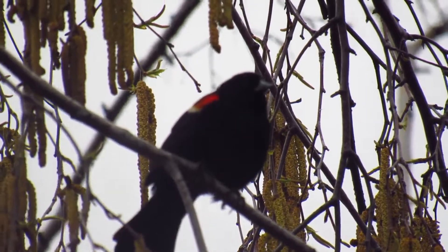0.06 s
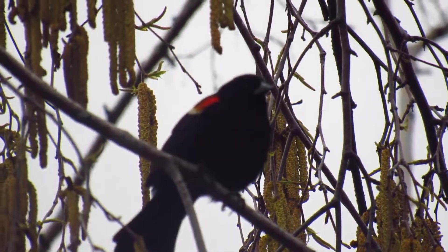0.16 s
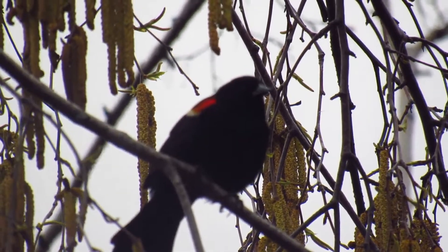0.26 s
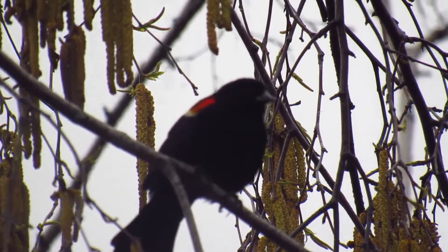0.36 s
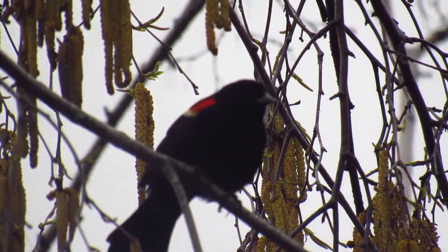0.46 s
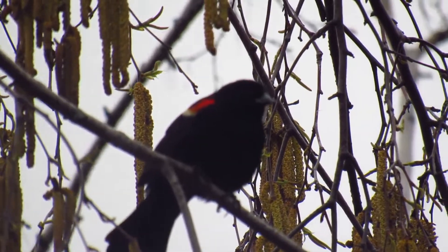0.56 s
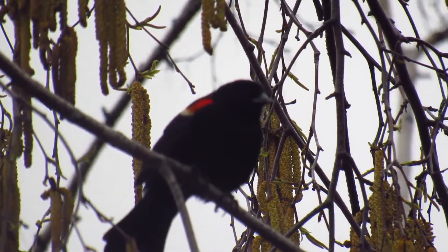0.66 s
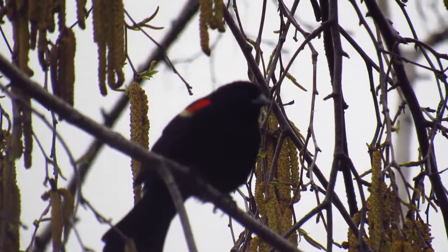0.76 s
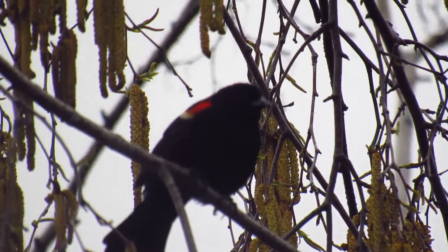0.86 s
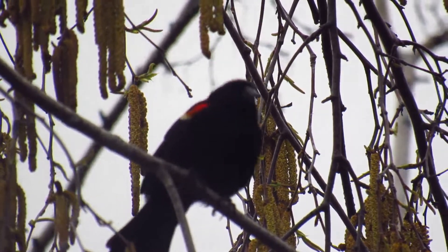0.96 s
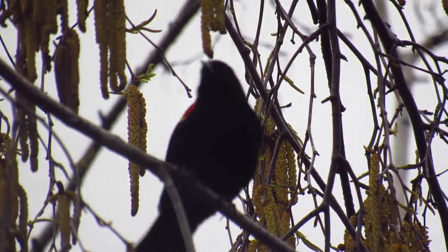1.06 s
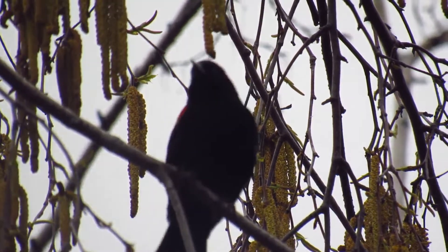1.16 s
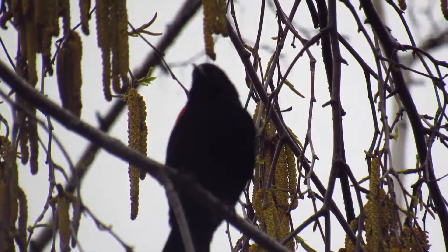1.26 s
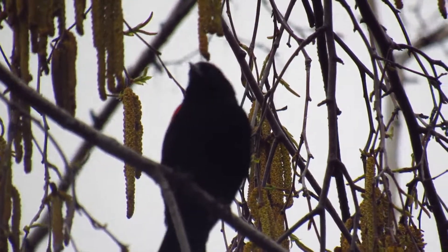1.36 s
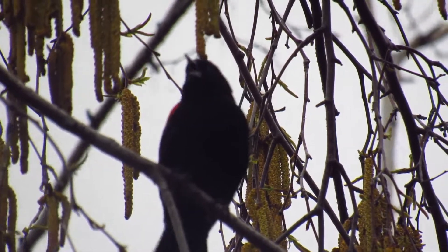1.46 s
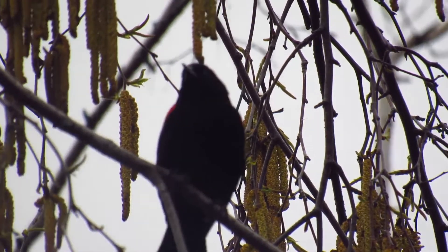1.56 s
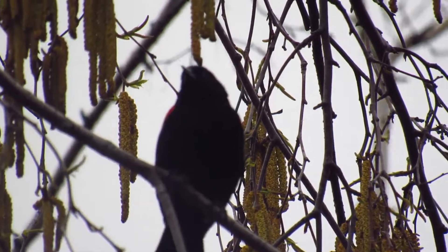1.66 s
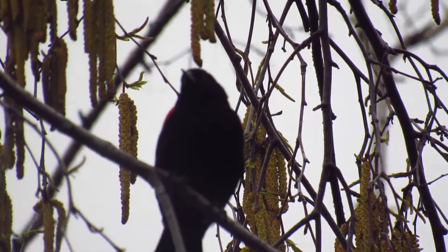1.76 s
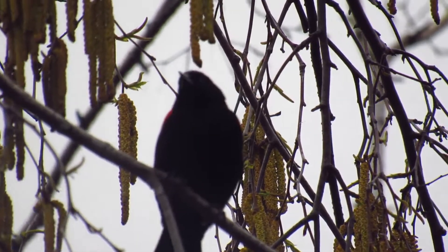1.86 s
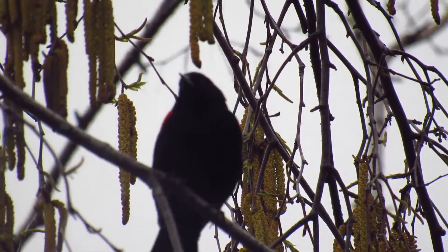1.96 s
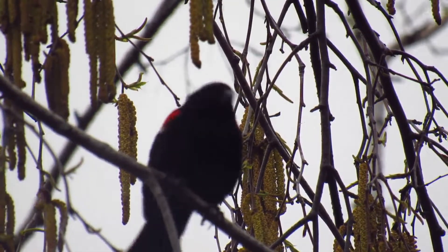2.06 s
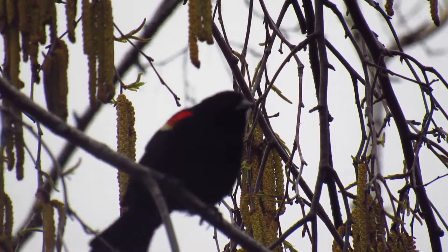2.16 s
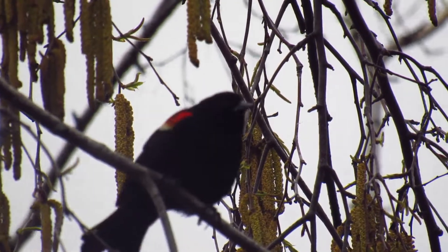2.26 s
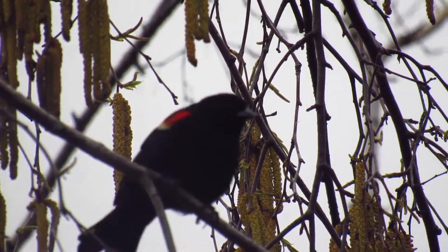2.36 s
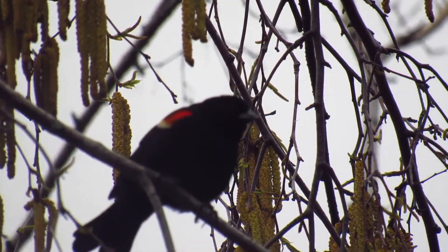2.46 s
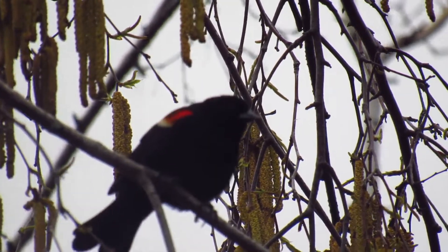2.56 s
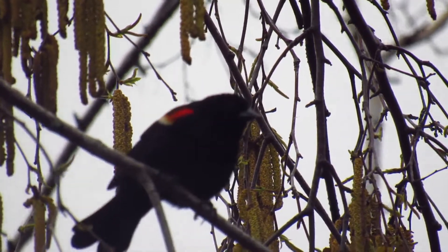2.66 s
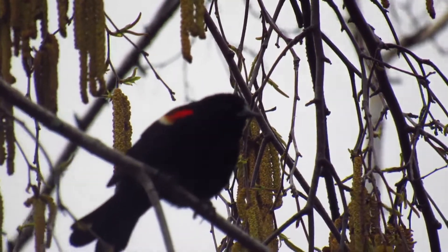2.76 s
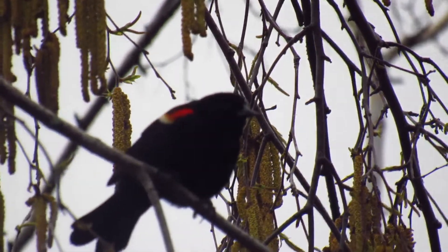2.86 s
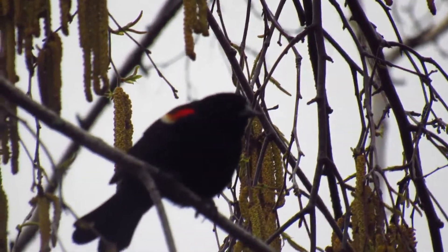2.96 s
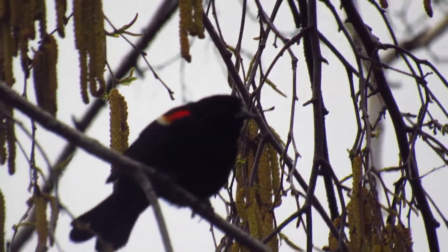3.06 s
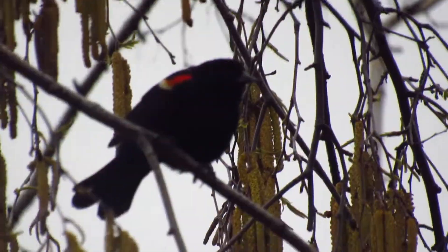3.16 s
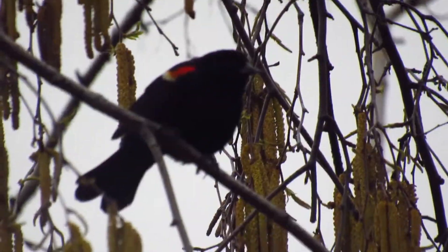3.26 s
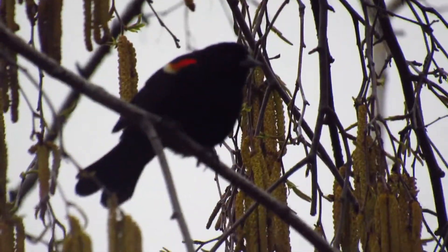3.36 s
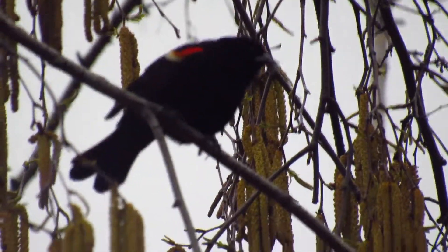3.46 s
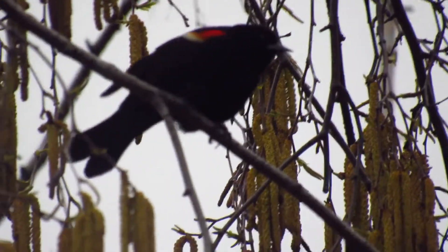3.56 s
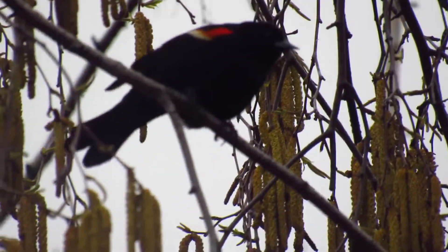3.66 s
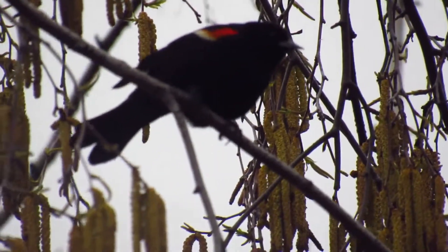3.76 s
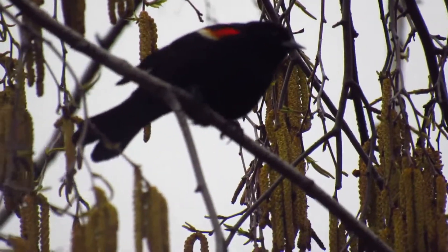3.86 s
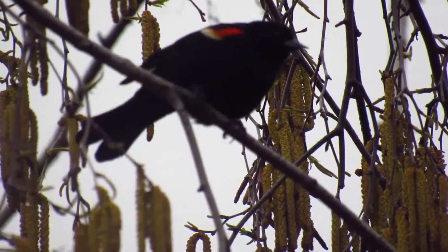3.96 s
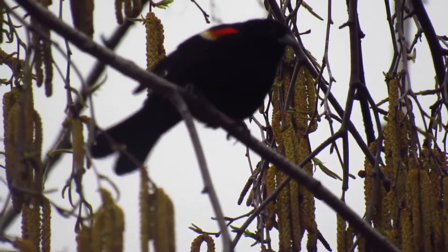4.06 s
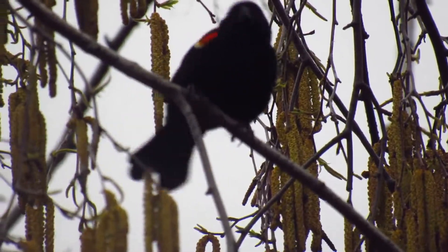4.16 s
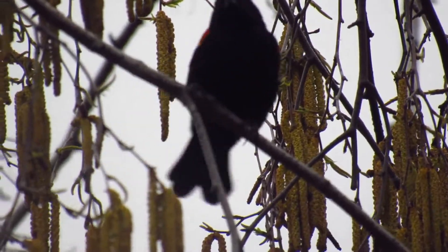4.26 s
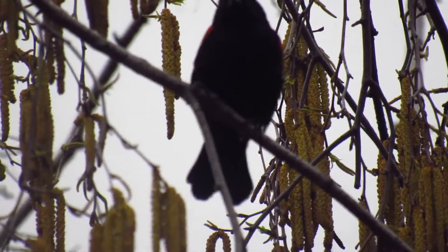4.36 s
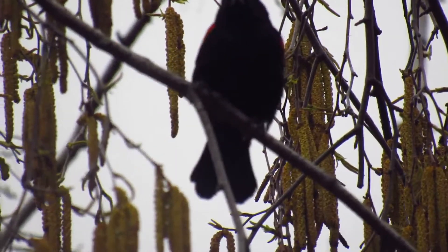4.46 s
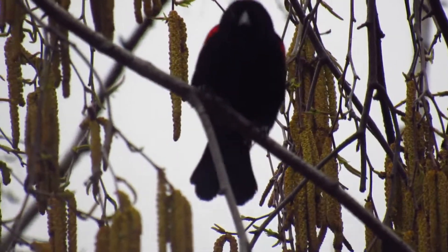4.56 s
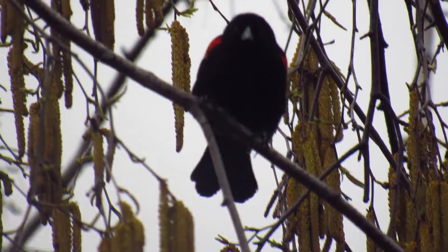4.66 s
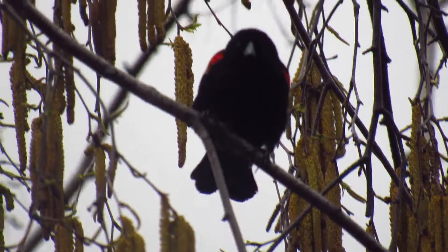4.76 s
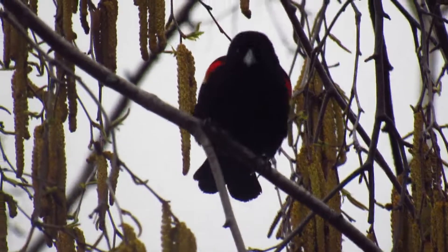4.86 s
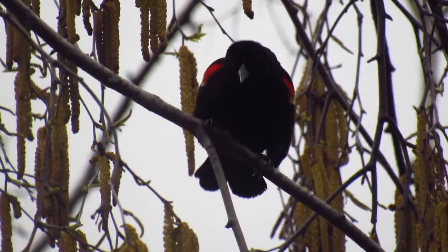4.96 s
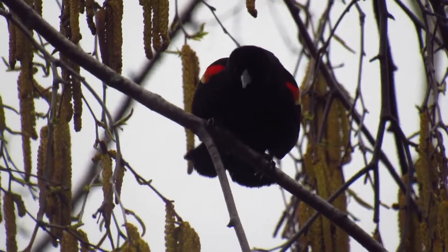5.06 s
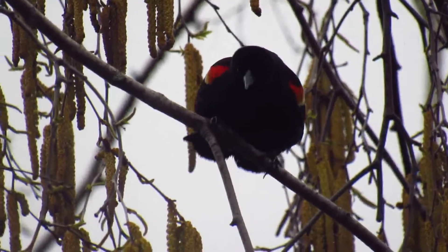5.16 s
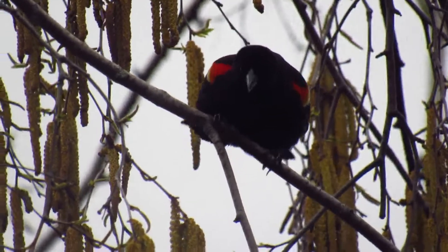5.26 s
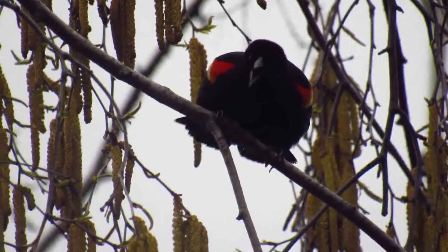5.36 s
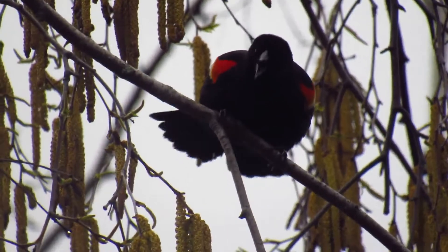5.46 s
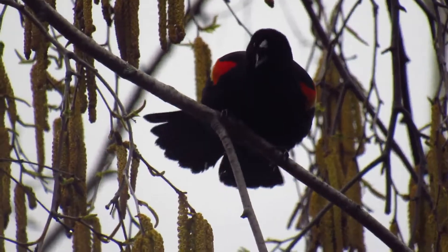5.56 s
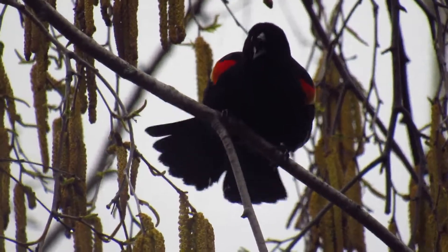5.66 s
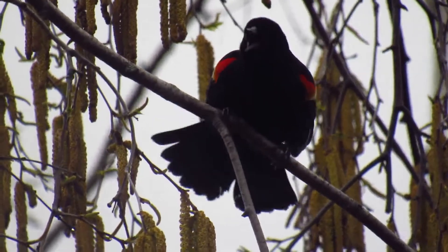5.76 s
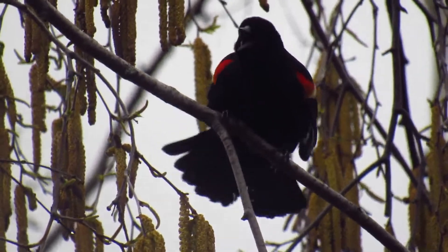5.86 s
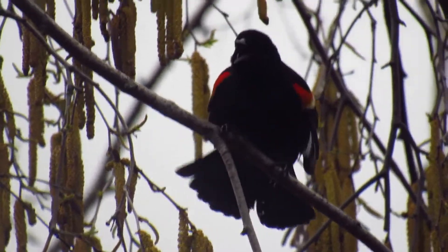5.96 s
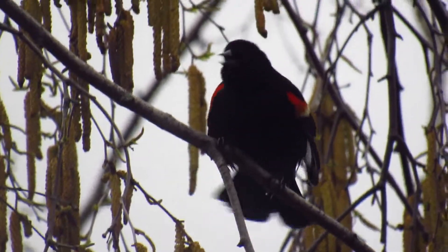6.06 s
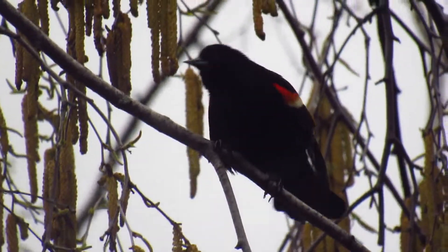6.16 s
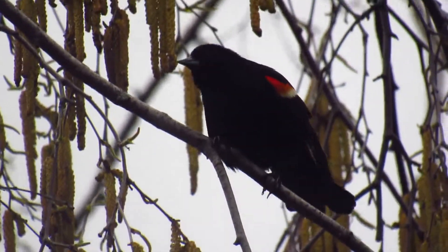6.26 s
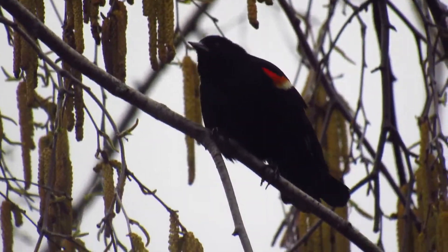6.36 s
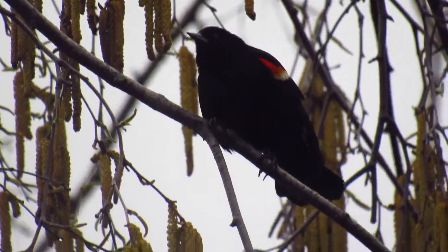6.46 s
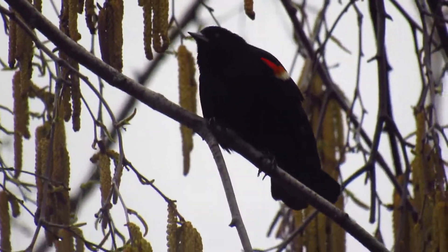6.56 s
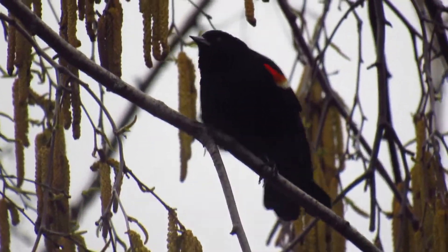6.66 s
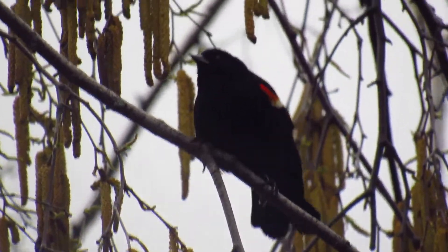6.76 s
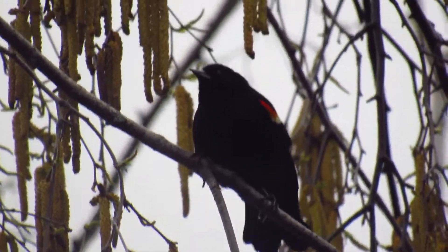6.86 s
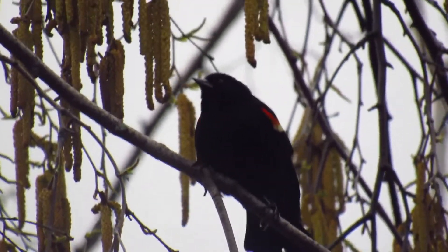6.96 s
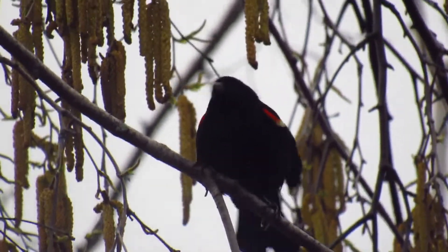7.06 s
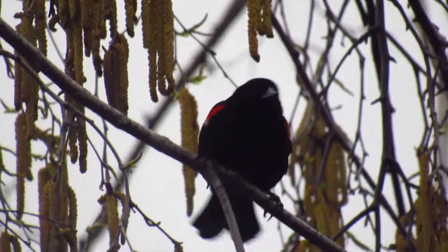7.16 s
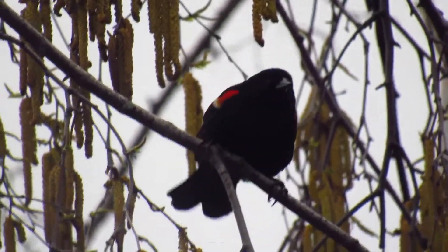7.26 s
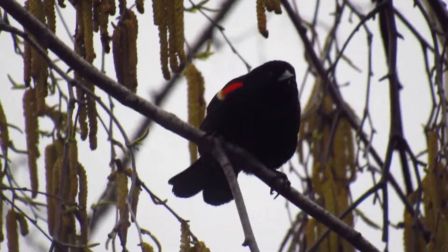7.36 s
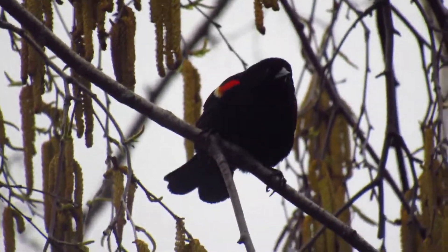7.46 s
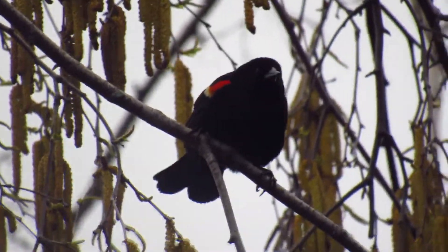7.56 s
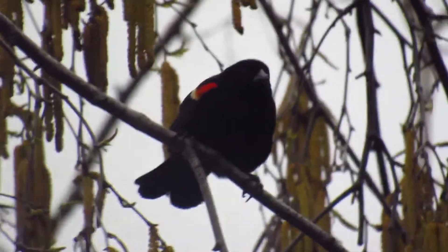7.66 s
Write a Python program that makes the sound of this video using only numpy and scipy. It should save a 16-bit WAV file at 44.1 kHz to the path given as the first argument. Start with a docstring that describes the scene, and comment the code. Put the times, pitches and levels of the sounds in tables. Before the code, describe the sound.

Stereo outdoor ambience among catkin-hung branches: low traffic hum, faint distant chirps and a dry tick. A blackbird gives one short harsh call, then a rival farther off answers with a fluttered trill. Aircraft rumble swells and low wind buffets the microphone. The near blackbird whistles, gurgles and breaks into a bright buzzing trill, with a light woodland echo. The rumble sinks unevenly, soft feather flaps and small chirps follow, and a sharp twig tick comes at the end.

```python
"""Over traffic hum, gliding chirps and the opposed pressures of wind, a twig tick precedes a blackbird's one call.
A rival answers from farther off with a fluttered trill, while an aircraft rumble of wandering bands swells.
The blackbird then sings: harmonic partials, shaped by a throat resonance, make gurgled notes, and fast
amplitude modulation makes a buzzy trill. The rumble sinks and varies; noise-band flaps follow, then
a last tick. Delayed, dying noise responses scatter the bird sounds among twigs and trunks."""
import sys
import numpy as np
from scipy import signal
from scipy.fft import rfft, irfft, next_fast_len
from scipy.io import wavfile
from scipy.ndimage import uniform_filter1d

SR = 44100
rng = np.random.default_rng(int(sys.argv[2]) if len(sys.argv) > 2 else 0)


def master_out(mix):
    """Clip the mix to full scale and print it as 16-bit PCM to the path in sys.argv[1]."""
    frames = np.transpose(np.atleast_2d(mix))
    ceiling = np.clip(frames, -1, 1)
    pcm = np.round(ceiling * 32767).astype(np.int16)
    wavfile.write(sys.argv[1], SR, pcm)


def decibels_to_gain(level_db):
    """Convert a level in decibels to a linear amplitude gain (20 dB per decade)."""
    exponent = np.asarray(level_db, float) / 20
    return 10 ** exponent


N = 340011
TIME = np.arange(N) / SR  # seconds

# Spectrum of the far road roar. Each row: frequency in Hz, relative level in dB.
TRAFFIC_SPECTRUM = [(56, -5), (95, 3), (134, 0), (201, -11), (304, -4), (390, -11), (418, -8.5),
                    (669, -25.5), (847, -15), (1160, -16.5), (1430, -23), (2360, -37), (2600, -36.5),
                    (3380, -51.5), (5720, -120)]
# Spectrum of far air and leaves. Each row: frequency in Hz, relative level in dB.
HISS_SPECTRUM = [(1180, -15), (2000, -7), (2300, -45), (2590, -3.5), (3080, -5.5), (3910, -4.5),
                 (4290, -6.5), (6650, -7.5), (12700, -9.5), (14500, -29)]
# Likeness of left and right in the diffuse noise. Each row: frequency in Hz, likeness from -1 to 1.
LIKENESS = [(60, 0.71), (150, 0.8), (380, 0.67), (950, 0.82), (2380, 0.77), (5980, 0.25), (15000, 0.08)]
TRAFFIC_DB, HISS_DB = -36, -64.5
WHINE_HZ, WHINE_MEDIAN_DB = 1401, -65.5

# Spectrum of the aircraft noise before its bands are weighted. Each row: frequency in Hz, relative level in dB.
RUMBLE_SPECTRUM = [(90, -1), (140, -1), (200, 0.5), (330, -3), (450, -17.5), (620, -14), (700, -59)]
# Engine tones. Each row: frequency in Hz, mean level in dB relative to the rumble.
ENGINE_TONES = [(421, -20.5), (490, -19.5)]
# Course of the aircraft. Each row: time in seconds, rumble level in dB, centre of its loudest band in Hz.
FLYOVER = [(0.0, -46, 205), (1.01, -37.5, 253), (2.0, -34.5, 192), (2.85, -39.5, 194), (3.22, -31.5, 260),
           (3.55, -35, 191), (3.93, -30.5, 208), (4.1, -31.5, 197), (4.55, -25, 256), (4.78, -29, 181),
           (5.24, -24, 231), (5.6, -24.5, 263), (5.99, -24, 267), (6.42, -33.5, 225), (6.7, -40, 205),
           (7.15, -33, 291), (7.45, -37.5, 219), (7.7, -31, 207)]

# Spectrum of the wind pressure. Each row: frequency in Hz, relative level in dB.
WIND_SPECTRUM = [(20, -55), (42, -14), (60, 27), (72, 18), (85, 9), (105, -30), (120, 26.5), (140, -3.5),
                 (200, 5), (300, -47)]
# Course of the wind. Each row: time in seconds, level in dB before gusts.
BREEZE = [(0, -62), (1.3, -70), (1.75, -53), (2.55, -53), (2.95, -43), (3.45, -37.5), (4.4, -37),
          (5.3, -51.5), (6.4, -33), (6.75, -39.5), (7.15, -38.5), (7.7, -42.5)]
GUST_SPREAD_DB, GUSTS_PER_S = 2.2, 2.5

# Dry twig ticks. Each row: start in seconds, level in dB before the high-pass filter.
TICKS = [(0.972, -40.5), (7.5637, -30.5)]

# Course of a far flock. Each row: time in seconds, level in dB.
CHATTER = [(0, -76), (3.4, -76), (3.9, -72), (4.5, -74), (5.2, -74), (7.7, -74)]
CHATTER_HZ, CHATTER_SPREAD = 2855, 0.14  # middle pitch, share by which it strays

# Mostly falling whistles. Each row: start in seconds, end in seconds, first Hz, last Hz, level in dB.
FALLS = [(0.648, 0.708, 4370, 4050, -65), (1.599, 1.628, 4300, 4130, -55), (1.783, 1.826, 4850, 4180, -67),
         (1.929, 1.986, 4920, 2920, -63.5), (2.667, 2.686, 3840, 2500, -57), (2.87, 3.074, 2175, 2195, -57),
         (3.602, 3.628, 3570, 2380, -58), (3.64, 3.8, 2450, 2400, -66), (4.29, 4.335, 2430, 2400, -63),
         (3.722, 3.814, 3890, 3870, -70.5), (3.813, 3.858, 5050, 2820, -64),
         (3.878, 3.925, 3400, 2260, -60), (5.352, 5.385, 2080, 2050, -50),
         (5.6245, 5.6305, 5480, 3060, -29.5), (7.11, 7.146, 3840, 2400, -61),
         (7.127, 7.17, 8400, 7850, -59), (7.146, 7.187, 4190, 3950, -54), (7.191, 7.202, 3970, 4000, -60),
         (7.2, 7.216, 2480, 2450, -57), (7.38, 7.443, 2530, 2350, -62), (7.5, 7.55, 2780, 2520, -62),
         (7.268, 7.333, 5170, 2740, -52), (7.287, 7.323, 3800, 2500, -54.5),
         (7.394, 7.452, 4820, 2710, -52), (7.413, 7.44, 3400, 2550, -56), (7.522, 7.574, 4670, 2880, -53),
         (7.538, 7.572, 3600, 2170, -54)]
# Mostly rising whistles. Each row: start in seconds, end in seconds, first Hz, last Hz, level in dB.
RISES = [(0.148, .18, 4430, 4630, -68), (0.311, 0.338, 4750, 4800, -65), (0.345, .39, 2570, 3140, -64),
         (0.428, .52, 2580, 2710, -68), (0.628, 0.652, 4120, 4380, -62), (1.585, 1.604, 2620, 4280, -59),
         (3.14, 3.22, 2360, 2340, -60), (3.852, 3.903, 4100, 4200, -64), (4.885, 4.945, 2920, 3350, -61),
         (5.02, 5.052, 4260, 4640, -65), (5.065, 5.11, 5360, 5800, -70), (5.068, 5.088, 4220, 4370, -63),
         (6.953, 6.982, 4330, 4900, -68), (7.08, 7.097, 4300, 4600, -64), (7.2, 7.236, 4250, 4940, -63)]
# Whistles returning to their first pitch. Each row: start in seconds, end in seconds, edge Hz, middle Hz,
# level in dB.
ARCHES = [(0.153, 0.192, 8550, 8300, -65), (0.3, 0.355, 2650, 2480, -60), (2.297, 2.378, 2420, 3080, -63),
          (4.255, 4.335, 2800, 3200, -63), (4.365, 4.452, 2650, 3200, -61)]
FALL_HALFWAY, RISE_HALFWAY = 0.35, 0.29  # share of the glide done at half length

# Bands of the short harsh call. Each row: delay in seconds, length in seconds, first Hz, last Hz,
# half-width in Hz, level in dB relative to the call.
CALL_BANDS = [(.003, .024, 2900, 4100, 650, 0), (.012, .026, 4250, 3800, 450, -2),
              (.006, .018, 10700, 10500, 700, -13), (.006, .045, 7800, 6000, 2000, -20),
              (.03, .035, 3900, 3700, 500, -20)]
CALL_S, CALL_DB = 1.624, -37.5
# Wing and tail flaps. Each row: start in seconds, length in seconds, level in dB.
FLAPS = [(6.294, .08, -51), (6.431, 0.098, -52.5), (6.596, 0.098, -53.5), (6.788, 0.083, -54.5)]
FLAP_HZ, FLAP_HALF_WIDTH_HZ = 4300, 900
# Hoarse unvoiced bursts. Each row: start in seconds, end in seconds, first Hz, last Hz, level in dB.
RASPS = [(2.872, 2.954, 5020, 4150, -49.5), (3.82, 3.985, 9900, 10000, -73), (4.06, 4.14, 9700, 9500, -69),
         (4.17, 4.252, 9000, 8600, -69), (5.39, 5.478, 6680, 6300, -60), (5.462, 5.523, 6860, 6800, -52),
         (5.482, 5.531, 11100, 11800, -49), (5.493, 5.587, 3000, 2910, -42.5),
         (5.472, 5.573, 4500, 4380, -51), (5.598, 5.644, 11100, 12600, -48.5),
         (5.65, 5.67, 4250, 3400, -45), (7.539, 7.67, 2280, 2220, -56.5)]
RASP_HALF_WIDTH_HZ = 500

# Spectrum of escaping breath. Each row: frequency in Hz, relative level in dB.
BREATH_SPECTRUM = [(1000, 10.5), (3000, 3), (7000, 2.5), (9000, 4), (11500, 3.5), (15000, -5)]
# Clear notes, the throat tuned to the pitch. Each row: start in seconds, end in seconds, pitch in Hz,
# level in dB, buzz from 0 to 1.
NOTES = [(2.575, 2.612, 1490, -47, 0.3), (2.688, 2.765, 2930, -55, .99), (2.69, 2.75, 2620, -52.5, 0.8),
         (2.755, 2.817, 2520, -61, 0.6), (2.8, 2.823, 2290, -45, 0.4), (2.804, 2.894, 2158, -40.5, 0.25),
         (2.835, 2.895, 2600, -54, 1), (5.148, 5.325, 1314, -35, 0.17), (5.285, 5.341, 1270, -43.5, 0.1),
         (5.369, 5.437, 2045, -27.5, 0.16), (5.42, 5.461, 1545, -41.5, 0.9), (5.438, 5.462, 2385, -34.5, 1),
         (5.459, 5.47, 2450, -40, 1), (5.452, 5.5, 5850, -46.5, 0.7), (5.465, 5.506, 4970, -43, 0.4),
         (5.473, 5.515, 6520, -52, 0.93), (5.485, 5.592, 1723, -46.5, 0.6), (5.571, 5.589, 2450, -33, 0.5),
         (5.582, 5.615, 6050, -51.5, 0.5), (5.614, 5.627, 3490, -30, 0.5), (5.584, 5.606, 3400, -53, .3),
         (5.625, 5.652, 5200, -36.5, 0.3), (5.633, 5.652, 3470, -35.5, 0.7)]
# Gurgles, the open throat lifting upper partials. Each row: start in seconds, end in seconds, pitch in Hz,
# throat centre in Hz, level in dB.
GURGLES = [(5.496, 5.565, 1717, 3750, -31.5), (5.504, 5.58, 859, 3630, -39),
           (5.583, 5.621, 397.6, 1980, -39)]
GURGLE_BUZZ, BEAK_HZ = 0.55, 6360

# Course of the rival's trill. Each row: time in seconds, level in dB, pitch in Hz.
FAR_TRILL = [(2.9, -55, 2704), (2.93, -49, 2766), (3.2, -48, 2823), (3.4, -50.5, 2910), (3.54, -50.5, 2970),
             (3.6, -75, 2900)]
# Course of the near trill. Each row: time in seconds, level in dB, pitch in Hz.
NEAR_TRILL = [(5.645, -40, 2898), (5.659, -31, 2920), (5.7, -33, 2852), (5.95, -33.5, 2880),
              (6.1, -35.5, 2828), (6.21, -36, 2778), (6.235, -53, 2860)]
# Breath through the rival's throat. Each row: frequency in Hz, relative level in dB.
FAR_THROAT = [(1350, -47), (2300, -9), (2580, -8), (2820, -5), (3240, -4.5), (3960, -2.5), (4560, -23),
              (5200, -5), (6040, -27), (6600, -24), (8580, -32), (14500, -120)]
# Breath through the near throat. Each row: frequency in Hz, relative level in dB.
NEAR_THROAT = [(1240, -65), (2100, -28), (2280, -14), (2580, 3), (2850, 4), (3330, -6), (3580, -0.5),
               (4630, -8.5), (5640, -8), (5970, -40), (6430, -11.5), (7150, -23), (8500, -15.5),
               (12500, -31), (15000, -24)]
# Nominal flutter rates of the far trill: first and last, in flutters per second.
FAR_FLUTTER = (325, 270)
# Nominal flutter rates of the near trill: first and last, in flutters per second.
NEAR_FLUTTER = (300, 287)
# Short tones in each group of the far trill. Each row: mean frequency in Hz, place in the group from 0 to 1,
# Gaussian width as a share of the group, mean level in dB.
FAR_STEPS = [(5150, 0.53, 0.23, 11.5), (4750, 1, .12, 3), (3980, 1, 0.092, -1), (4100, 0.7, 0.083, 12.5),
             (3400, 0.5, 0.092, 0)]
# Upper partials of the far trill, from the second up: gain in dB before the snap.
FAR_UPPER_DB = [-28]
# Upper partials of the near trill, from the second up: gain in dB before the snap.
NEAR_UPPER_DB = [-7.5, -30.5]
FLUTTER_FLOOR, SNAP_DB = 0.62, 7.5  # low voice left between flutters, gain of the last flutter
GASP_SHARE = 0.45  # decay of the breath as a share of a group

WOOD_T60_S, WOOD_DB = 0.1, -8.5  # near twigs; level of the whole scatter
ECHO_T60_S, ECHO_DB = 3.1, -30  # far trunks; start level relative to the twigs
SMALL_SCATTER, NEAR_SCATTER, FAR_SCATTER = 0.5, 0.65, 1.7  # gains into the scatter; notes and rasps have 1


def rms_one(x):
    """Normalisation: the signal is scaled to unit mean power."""
    return x / np.sqrt(np.mean(x ** 2) + 1e-20)


def in_time(rows):
    """Linear interpolation: each column becomes a curve over all samples."""
    s, *columns = np.transpose(rows)
    return [np.interp(TIME, s, c) for c in columns]


def at_hz(points, hz):
    """Logarithmic frequency axis: a spectrum is interpolated along equal musical intervals."""
    points = np.array(points, float)
    return np.interp(np.log(hz + 1), np.log(points[:, 0] + 1), points[:, 1])


def colour(x, spectrum):
    """Linear filtering: a flat signal is weighted by a spectrum and brought to unit power."""
    size = next_fast_len(N)
    hz = np.arange(size // 2 + 1) * SR / size
    return rms_one(irfft(rfft(x, size) * decibels_to_gain(at_hz(spectrum, hz)), size)[..., :N])


def drift(rate_hz):
    """Low-pass filtered noise: two equal real poles give a smooth random curve of unit rms."""
    r = np.exp(-2 * np.pi * rate_hz / SR)
    noise = rng.standard_normal(N + SR)
    return rms_one(signal.lfilter([1], [1, -2 * r, r * r], noise)[SR:])


def swell(s, start, end, sharp):
    """Amplitude envelope: a power of a half sine rises and falls between two times."""
    return np.sin(np.pi * np.clip((s - start) / (end - start), 0, 1)) ** sharp


def diffuse(spectrum, level_db):
    """Diffuse field: noise from all around, its left-right likeness depending on frequency."""
    size = next_fast_len(N)
    hz = np.arange(size // 2 + 1) * SR / size
    alike = np.clip(at_hz(LIKENESS, hz), -1, 1)
    mid, side = rfft(rng.standard_normal((2, size)))
    both = np.sqrt(1 + alike) * mid + np.sqrt(1 - alike) * side * [[1], [-1]]
    return decibels_to_gain(level_db) * colour(irfft(both, size)[:, :N], spectrum)


def traffic():
    """Superposition of incoherent sources: road roar, one faint whine and the hiss of open air."""
    whine_gain = decibels_to_gain(WHINE_MEDIAN_DB + 6.05 * drift(5.4))
    whine = whine_gain * np.sin(2 * np.pi * WHINE_HZ * TIME)
    return diffuse(TRAFFIC_SPECTRUM, TRAFFIC_DB) + whine + diffuse(HISS_SPECTRUM, HISS_DB)


def aircraft(level_db, centre_hz, octaves=0.47):
    """Interference of direct and ground-reflected jet noise: the loudest band of the rumble wanders."""
    rumble, edges = 0, np.geomspace(60, 720, 13)  # Hz
    noise = colour(rng.standard_normal((2, N)), RUMBLE_SPECTRUM)
    for k, (low, high) in enumerate(zip(edges, edges[1:])):
        band_filter = signal.butter(2, [low, high], "band", fs=SR, output="sos")
        band = signal.sosfilt(band_filter, noise[k % 2])
        away = np.log2(np.sqrt(low * high) / centre_hz) / octaves
        weight_db = np.maximum(-6.0 * away ** 2, -9.0)
        rumble = rumble + band * decibels_to_gain(weight_db + 2.48 * drift(2.85))
    # running rms over half a second, so that level_db governs the loudness
    running_rms = np.sqrt(uniform_filter1d(rumble ** 2, SR // 2) + 1e-12)
    tones = sum(decibels_to_gain(db + 1.0 * drift(0.18)) * np.sin(2 * np.pi * hz * TIME) for hz, db in ENGINE_TONES)
    return decibels_to_gain(level_db) * (rumble / running_rms + tones)


def wind(level_db):
    """Turbulent pressure: lumpy noise presses on the two ports, mostly in opposite sense."""
    shared, left, right = colour(rng.standard_normal((3, N)), WIND_SPECTRUM)
    push = 2.2 * shared * [[1.1], [-0.9]] + np.array([left, right])
    return decibels_to_gain(level_db + GUST_SPREAD_DB * drift(GUSTS_PER_S)) * push


def wood(x):
    """Multiple scattering: near twigs and fainter, longer far trunks give a dying noise response per ear."""
    s = TIME[:SR]
    fade = decibels_to_gain(-60 * s / WOOD_T60_S) + decibels_to_gain(ECHO_DB - 60 * s / ECHO_T60_S)
    tail = rng.standard_normal((2, len(s))) * fade * (s > 0.004)
    tail[1] = 0.9 * tail[0] + 0.42 * tail[1]  # the ears hear partly alike
    tail = signal.sosfilt(signal.butter(1, 6000, fs=SR, output="sos"), tail)
    tail = tail / np.sqrt(np.sum(tail ** 2) / 2)
    return signal.fftconvolve(x[None], tail, axes=1)[:, :N]


def aside(x, lag_s, db_per_khz=-0.03):
    """Interaural difference: the left port hears the sound a little later and slightly duller."""
    size = next_fast_len(N)
    hz = np.arange(size // 2 + 1) * SR / size
    turn = np.exp(-2j * np.pi * hz * lag_s) * decibels_to_gain(db_per_khz * hz / 1000)
    return np.array([irfft(rfft(x, size) * turn, size)[:N], x])


def ticks():
    """Impulsive radiation: exponentially dying, high-passed noise makes short bright snaps."""
    out = np.zeros(N)
    for s, db in TICKS:
        snap = rng.standard_normal(88) * np.exp(-np.arange(88) / 21.0)  # in samples
        out[round(s * SR):][:88] += decibels_to_gain(db) * snap
    return signal.sosfilt(signal.butter(2, 4500, "high", fs=SR, output="sos"), out)


def chatter():
    """Superposition: seven far, hoarse voices, wandering in pitch and in spurts, blur into a murmur."""
    level_db, = in_time(CHATTER)
    voices = np.zeros(N)
    for _ in range(7):
        spurts = np.clip(drift(20), 0, 1.5)
        hz = CHATTER_HZ * (1 + CHATTER_SPREAD * drift(8) + 0.04 * drift(200))
        voices += spurts * np.sin(2 * np.pi * np.cumsum(hz) / SR)
    return decibels_to_gain(level_db) * rms_one(voices)


def whistle_rows():
    """Parametrisation: every whistle as start, end, first, middle and last pitch, and level."""
    glides = []
    for rows, half in ((FALLS, FALL_HALFWAY), (RISES, RISE_HALFWAY)):
        glides += [(a, b, f, f + half * (g - f), g, db) for a, b, f, g, db in rows]
    return glides + [(a, b, edge, middle, edge, db) for a, b, edge, middle, db in ARCHES]


def chirps():
    """Frequency modulation: pure sines glide through three pitches; below -52 dB, fainter ones flicker more."""
    out, flicker = np.zeros(N), drift(60)
    for start, end, first_hz, middle_hz, last_hz, db in whistle_rows():
        i = slice(round(start * SR), round(end * SR))
        u = (TIME[i] - start) / (end - start)
        # parabola through the three pitches
        hz = first_hz * (1 - u) * (1 - 2 * u) + middle_hz * 4 * u * (1 - u) + last_hz * u * (2 * u - 1)
        flicker_db = flicker[i] * np.clip(-0.3 * (db + 52), 0, 4)
        whistle = np.sin(2 * np.pi * np.cumsum(hz) / SR)
        out[i] += decibels_to_gain(db + 3 + flicker_db) * swell(TIME[i], start, end, 0.6) * whistle
    return out


def rasp_rows():
    """Parametrisation: call bands, flaps and bursts as start, end, first and last centre, half-width, level."""
    call = [(CALL_S + lag, CALL_S + lag + s, f, g, w, CALL_DB + db) for lag, s, f, g, w, db in CALL_BANDS]
    flaps = [(s, s + length, FLAP_HZ, FLAP_HZ, FLAP_HALF_WIDTH_HZ, db) for s, length, db in FLAPS]
    return call + flaps + [(a, b, f, g, RASP_HALF_WIDTH_HZ, db) for a, b, f, g, db in RASPS]


def rasps():
    """Quadrature modulation: low-passed noise is carried to a gliding centre, with sudden start and slower fade."""
    out, white, ragged_db = np.zeros(N), rng.standard_normal((2, N)), 3.0 * drift(90)
    air = colour(rng.standard_normal(N), BREATH_SPECTRUM)
    for start, end, first_hz, last_hz, half_width_hz, db in rasp_rows():
        i = slice(round(start * SR), min(round(end * SR), N))
        u = (TIME[i] - start) / (end - start)
        phase = 2 * np.pi * np.cumsum(first_hz + (last_hz - first_hz) * u) / SR
        low_pass = signal.butter(3, half_width_hz, fs=SR, output="sos")
        a, b = rms_one(signal.sosfilt(low_pass, white[:, i]))
        band = a * np.cos(phase) + b * np.sin(phase) + 0.2 * air[i]
        out[i] += decibels_to_gain(db + ragged_db[i]) * np.sin(np.pi * np.abs(u) ** 0.6) * band
    return out


def trill(rows, throat, per_s, steps, count, climb, dip, throb, rough, upper_db, uneven_db, grow_db):
    """Amplitude modulation: flutters in groups; the low voice climbs, the upper snaps down, breath follows."""
    level_db, pitch_hz = in_time(rows)
    start, end = rows[0][0], rows[-1][0]
    flutter_hz = np.interp(TIME, [start, end], per_s) * (1 + 0.015 * drift(40))
    turns = np.cumsum(flutter_hz) / SR
    in_group = turns % count
    place = in_group / count
    flutter = (0.5 - 0.5 * np.cos(2 * np.pi * turns)) * decibels_to_gain(1.0 * drift(88))
    fall = uniform_filter1d(np.clip(in_group - (count - 0.85), 0, 2) ** 2, 24)
    snap = uniform_filter1d(1.0 * (in_group > count - 1), 40)

    waver = 0.009 * drift(130)
    climbing = climb * uniform_filter1d(place - 0.5, 40)
    low = 2 * np.pi * np.cumsum(pitch_hz * (1 + waver + climbing)) / SR
    high = 2 * np.pi * np.cumsum(pitch_hz * (1 + waver - dip * fall)) / SR
    # each group swells once, and the low voice gains strength along the trill
    beat = (1 + throb * np.cos(2 * np.pi * place)) ** 2 * decibels_to_gain(uneven_db * drift(70))
    beat *= decibels_to_gain(np.interp(TIME, [start, end], [-grow_db / 2, grow_db / 2]))
    tone = (FLUTTER_FLOOR + flutter) * beat * np.sin(low)
    for k, db in enumerate(upper_db, 2):
        tone += decibels_to_gain(db + SNAP_DB * snap) * (0.4 + flutter) * np.sin(k * high)

    shake, fade_db = 0.04 * drift(150), 2.0 * drift(30)
    for hz, at, share, db in steps:
        # rolling the curves by hz samples makes the tones vary apart
        distance = (place - at + 0.5) % 1 - 0.5
        gate = np.exp(-(distance / share) ** 2) * decibels_to_gain(np.roll(fade_db, round(hz)))
        phase = 2 * np.pi * np.cumsum(hz * (1 + np.roll(shake, round(hz)))) / SR
        tone += decibels_to_gain(db) * gate * (0.25 + flutter) * np.sin(phase)

    gasp = uniform_filter1d(np.exp(-place / GASP_SHARE), 60)
    breath = colour((gasp + 0.44 * flutter) * rng.standard_normal(N), throat)
    voice = rms_one(rms_one(tone) + rough * breath)
    return decibels_to_gain(level_db) * voice * uniform_filter1d(1.0 * (TIME > start) * (TIME < end), 200)


def voiced_rows():
    """Parametrisation: notes and gurgles as start, end, pitch, throat centre, level and buzz."""
    clear = [(a, b, hz, hz, db, buzz) for a, b, hz, db, buzz in NOTES]
    return clear + [(*row, GURGLE_BUZZ) for row in GURGLES]


def notes(octaves=0.39, leak_db=-28, buzz_hz=140, breath_db=-18):
    """Source and filter: a throat shapes syrinx partials; a second membrane makes them buzz and lets breath by."""
    out, air = np.zeros(N), colour(rng.standard_normal(N), BREATH_SPECTRUM)
    slip, waver = drift(52.5), drift(130)
    rows = voiced_rows()
    for (start, end, hz, centre_hz, db, buzz), luck in zip(rows, rng.random((len(rows), 40))):
        i = slice(round(start * SR), round(end * SR))
        s = TIME[i]
        phase = 2 * np.pi * np.cumsum(hz * (1 + 0.022 * buzz * waver[i])) / SR
        gate = 1 + np.clip(buzz, 0, 1) * np.sin(2 * np.pi * buzz_hz * s + 1.0 * slip[i])
        tone, breath = 0, (0.15 + buzz) * decibels_to_gain(breath_db) * air[i]
        for k in range(1, min(int(15000 / hz), 39) + 1):
            throat_db = -6 * (np.log2(k * hz / centre_hz) / octaves) ** 2
            # leakage favours odd partials, most near the beak's ring
            from_beak = abs(np.log2(k * hz / BEAK_HZ))
            partial_leak_db = leak_db - 7.2 * (k % 2 == 0) - 10.0 * from_beak
            tone = tone + decibels_to_gain(max(throat_db, partial_leak_db)) * np.sin(k * phase + 6 * luck[k])
        out[i] += decibels_to_gain(db + 3) * swell(s, start, end, 1.4) * (gate * tone + breath)
    return out


def scene():
    """Superposition of direct and scattered sound: birds near the middle, traffic and aircraft a little left."""
    rumble_db, centre_hz = in_time(FLYOVER)
    wind_db, = in_time(BREEZE)
    ground = traffic() * decibels_to_gain([[1.5], [-1.5]]) + aircraft(rumble_db, centre_hz) * decibels_to_gain([[1.7], [-1.9]])
    small = chirps() + chatter()
    far = trill(FAR_TRILL, FAR_THROAT, FAR_FLUTTER, FAR_STEPS, count=5, climb=0.09, dip=0.12, throb=1.0,
                rough=0.73, upper_db=FAR_UPPER_DB, uneven_db=1.2, grow_db=8)
    near = trill(NEAR_TRILL, NEAR_THROAT, NEAR_FLUTTER, [], count=3, climb=0.13, dip=0.33, throb=0.12,
                 rough=0.55, upper_db=NEAR_UPPER_DB, uneven_db=1.0, grow_db=3)
    voiced = notes() + rasps()
    direct = aside(voiced + near + small + far, lag_s=1.3e-5) + ticks() * decibels_to_gain([[1.5], [-1.5]])
    scattered = wood(voiced + SMALL_SCATTER * small + NEAR_SCATTER * near + FAR_SCATTER * far)
    return direct + decibels_to_gain(WOOD_DB) * scattered + ground + wind(wind_db)


def band_limit(x):
    """A steep low-pass at the top of the band."""
    return signal.sosfilt(signal.butter(12, 16170, fs=SR, output="sos"), x)


def record(dry):
    """Band limitation: a steep low-pass filter removes the top above 16 kHz."""
    mix = signal.sosfilt(signal.cheby2(12, 70, 16000, fs=SR, output="sos"), dry)
    return band_limit(mix)


dry = scene()
out = record(dry)
master_out(out)
```